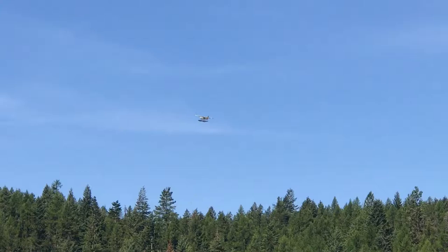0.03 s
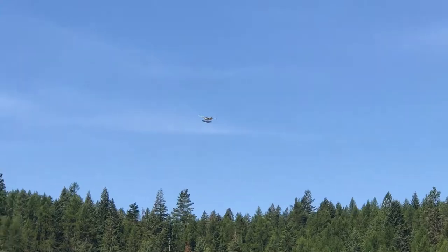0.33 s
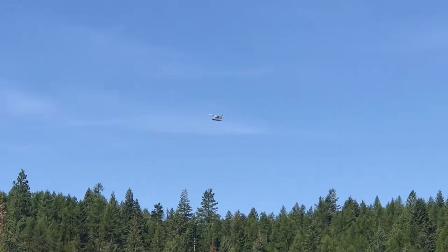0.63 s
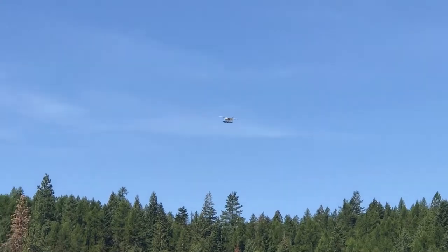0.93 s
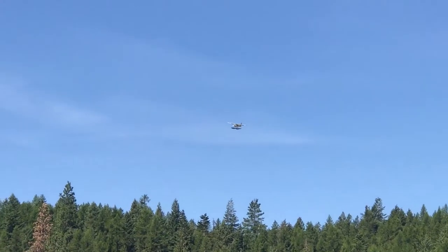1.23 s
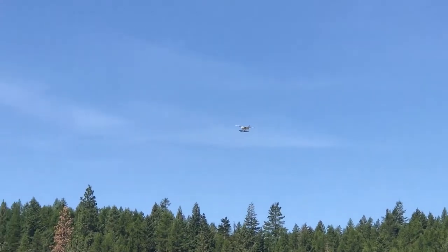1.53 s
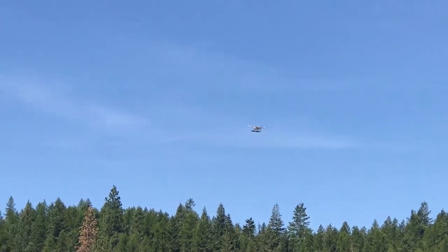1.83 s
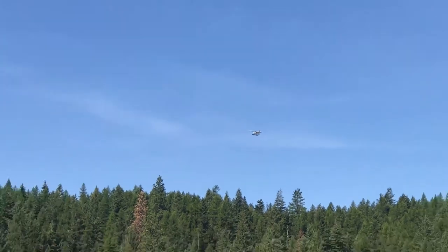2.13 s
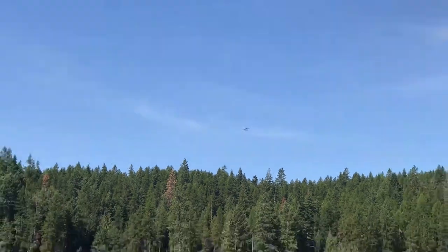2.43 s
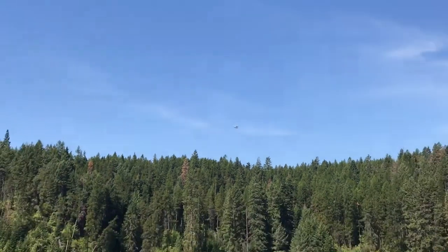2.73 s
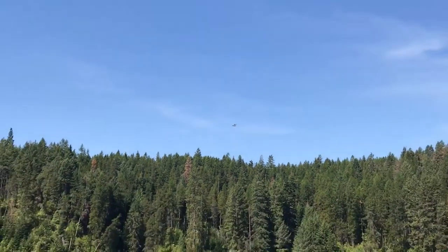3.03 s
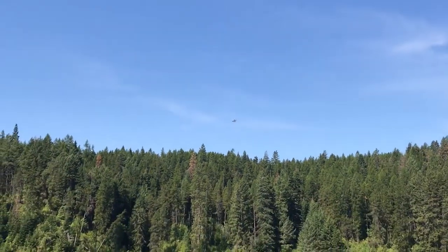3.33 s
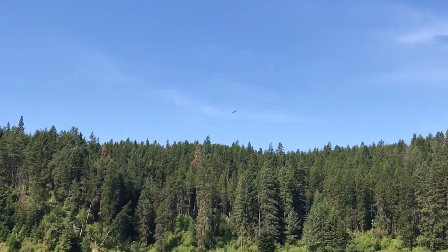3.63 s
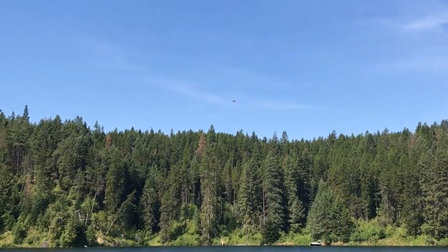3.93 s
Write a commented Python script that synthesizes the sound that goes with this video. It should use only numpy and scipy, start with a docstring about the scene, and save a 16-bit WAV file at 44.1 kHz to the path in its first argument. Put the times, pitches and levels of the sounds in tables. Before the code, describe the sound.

A small propeller plane drones far overhead, with light wind on the microphone.

```python
"""A small propeller aircraft drones far overhead, wavering in the moving air, while light wind
rumbles on the microphone. At first the blades hum and buzz, and a bird chirps faintly.
From about 1.5 s the exhaust takes over, one throb per shaft turn, and a rasp of torn air comes
and goes, combed by its bounce off the ground. After 2 s the aircraft turns away and its pitch
sinks; the handled camera clicks twice, and the rasp swells again near the end."""
import sys
import numpy as np
from scipy import signal
from scipy.fft import rfft, irfft
from scipy.io import wavfile
from scipy.ndimage import uniform_filter1d, map_coordinates

SR = 44100
rng = np.random.default_rng(int(sys.argv[2]) if len(sys.argv) > 2 else 0)


def output_pcm(signal):
    """Save a mono or channel-first signal as 16-bit PCM at the path in sys.argv[1].

    Samples are clipped to [-1, 1] before scaling.
    """
    pcm = np.clip(np.atleast_2d(signal).T, -1, 1) * 32767
    wavfile.write(sys.argv[1], SR, np.round(pcm).astype(np.int16))


N = 176400
T = np.arange(N) / SR

# Shaft speed as heard from the ground: time_s, rate_hz
SHAFT_RATE = [(.13, 47.58), (.7, 47.66), (1.15, 47.72), (1.4, 47.36), (1.7, 48.03), (2.12, 47.55),
              (2.54, 46.63), (2.99, 45.51), (3.28, 44.16), (3.51, 43.53), (3.7, 42.9), (4, 42.77)]
# Envelopes of the blade-passing hum, its octave, the growl and the thin buzz: time_s, level_db
HUM_LEVEL = [(.13, -41), (.5, -34), (.75, -35), (1.03, -36.5), (1.3, -41), (1.75, -47.5), (2.5, -49),
             (3.4, -52), (3.7, -42), (4, -45)]
OCTAVE_LEVEL = [(.13, -55.5), (.27, -38), (.55, -44), (1.03, -36.5), (1.3, -43), (1.65, -52.5), (2.3, -50),
                (2.6, -47), (2.8, -40), (3.25, -44), (3.6, -43.5), (4, -54.5)]
GROWL_LEVEL = [(.13, -47.5), (.25, -43.5), (.44, -44.5), (.51, -40.5), (.65, -39), (.78, -43),
               (1.03, -41.5), (1.3, -48.5), (1.6, -50.5), (2.1, -58.5), (2.7, -54), (4, -76)]
BUZZ_LEVEL = [(.13, -56), (.3, -46), (.75, -52.5), (1.03, -48), (1.3, -47.5), (1.6, -47), (2.1, -54.5),
              (2.6, -58), (4, -65)]
# Harmonics of the blades' growl and buzz and of the exhaust throb: shaft_multiple, gain_db
GROWL_HARMONICS = [(8, -3.5), (9, -8.5), (10, -7.5), (11, -6.5), (12, -8.5), (13, -8.5), (14, -3.5)]
BUZZ_HARMONICS = [(16, -2), (18, -9), (20, -8.5), (22, -5), (24, -7), (26, -23.5), (28, -10), (30, -16.5),
                  (32, -16)]
THROB_HARMONICS = [(3, -27.5), (4, -31), (5, -10.5), (6, 1.5), (7, -2), (8, -6.5), (9, -9), (10, -25),
                   (11, -20)]
# Each exhaust beat's lag behind a blade pulse and its phase smear: time_s, lag_rad, smear_rad
BEAT_SHAPE = [(1.55, .65, .2), (1.9, .7, .38), (2.4, .9, .3), (2.8, -.8, -.27), (3.5, -.8, -.3)]
# Envelopes of the exhaust throb, the low roar and the high rasp: time_s, level_db
THROB_LEVEL = [(.13, -48), (.22, -48.5), (.42, -45.5), (.5, -37.5), (.62, -47), (.8, -44.5), (1.05, -38),
               (1.3, -47.5), (1.41, -43), (1.5, -36), (1.6, -34), (1.75, -36.5), (2, -37.3), (2.3, -38),
               (2.55, -40.5), (2.8, -43), (3.05, -41), (3.35, -41.5), (3.55, -47), (3.72, -45), (4, -59)]
ROAR_LEVEL = [(.13, -40.5), (.24, -41.5), (.34, -44), (.44, -45), (.52, -37), (.65, -44.5), (.8, -38.5),
              (1, -37.5), (1.3, -42), (1.58, -43.5), (1.8, -40.5), (1.95, -41.5), (2.3, -45.5), (3, -53),
              (3.6, -54.5), (4, -57)]
RASP_LEVEL = [(.13, -52), (.3, -51), (.42, -55), (.65, -53.5), (.8, -51.5), (1, -51.5), (1.15, -53.5),
              (1.33, -47), (1.44, -41.5), (1.55, -46.5), (1.67, -47), (1.82, -51.5), (2.03, -46),
              (2.15, -50), (2.33, -45), (2.45, -51), (2.67, -48.5), (2.87, -53), (3.07, -51.5),
              (3.2, -45.5), (3.4, -49.5), (3.53, -42), (3.62, -40), (3.72, -42), (3.85, -44), (4, -45.5)]
# Delay of the ground bounce: time_s, delay_ms
GROUND_DELAY = [(.13, 2.494), (1.4, 2.438), (2.1, 2.39), (3.3, 2.773), (3.65, 2.67), (4, 2.5)]
# Tone colour of each noise layer: frequency_hz, gain_db
ROAR_EQ = [(100, -14), (220, -3.5), (330, 6.5), (450, -4), (600, 4.5), (800, -1.5), (1150, -3), (1600, -13),
           (2500, -31.5), (5000, -66)]
RASP_EQ = [(300, -32), (700, -4.5), (1150, 1), (1450, 1.5), (1800, 3.5), (2300, -1.5), (2700, -7.5),
           (3200, -14.5), (4000, -22.5), (5000, -40.5), (8000, -71.5)]
RUMBLE_EQ = [(20, -32), (32, -22.5), (48, -0.5), (70, 0.5), (110, -3.5), (160, -4), (300, -0.5),
             (1000, -17), (3000, -66.5)]
PUFF_EQ = [(20, -22), (40, -4), (60, 0), (120, -3), (170, -12), (300, -32), (1500, -80)]
HISS_EQ = [(1000, 9.5), (4000, 8), (6000, 3), (7600, 0), (8600, 3.5), (10500, -2.5), (12000, 3),
           (14000, -1.5), (14900, 1), (15500, -2)]
CLICK_EQ = [(1000, -22), (2300, -1), (3000, -11), (3800, -3), (4700, -10), (5600, -7), (6700, -24),
            (7300, -18), (7900, -3), (8800, 1.5), (10400, -7), (11500, 1), (12800, 6), (14400, 2),
            (15200, -15)]
# Puffs of wind on the microphone: centre_s, level_db, half_length_s
PUFFS = [(0.214, -47.5, 0.035), (0.433, -40.5, 0.054), (0.652, -38.5, 0.02), (1.052, -39.5, 0.013),
         (1.302, -48, 0.023), (2.007, -47, 0.046), (2.374, -46.5, .04)]
# Ticks of the camera body: start_s, peak_db
CLICKS = [(2.3085, -54), (2.661, -24)]
# Bird notes: centre_s, pitch_hz, glide_hz_per_s, peak_db, half_length_s
CHIRPS = [(.486, 4380, 15000, -72, .011), (.711, 4280, 0, -53.5, .0011), (.748, 5150, 0, -65, .001)]

BLADE_SMEAR_RAD = .06  # higher harmonics lag, which softens each blade pulse
LIMP_RAD = .048  # exhaust beats fall alternately early and late by this shaft angle
RING_MULTIPLE = 6.5  # centre of the exhaust's ring, in shaft rates
ROAR_TRIM_DB, GROUND_GAIN = -1.5, .45
RUMBLE_DB, RUMBLE_FADE_DB_PER_S, HISS_DB = -43.5, .2, -73
CLICK_T60_S = .0049
OPEN_S, TOP_HZ = .12, 15800


def propeller(shaft):
    """Two blades chop the air: a low hum, under a growl and a buzz that moving air shakes more."""
    def harmonic(k, angle, **waver):
        return partial(k * angle - BLADE_SMEAR_RAD * k ** 2, **waver)

    hum = amp(curve(HUM_LEVEL)) * harmonic(2, shaft, waver_db=.5, drift_rad=.11, rate_hz=6.9)
    hum += amp(curve(OCTAVE_LEVEL)) * harmonic(4, shaft, waver_db=2.95, drift_rad=.16, rate_hz=14)
    hum *= amp(.9 * wobble(28))
    shaken = shaft + .035 * wobble(22)
    growl = sum(amp(db) * harmonic(k, shaken, waver_db=2.8, drift_rad=.55, rate_hz=10)
                for k, db in GROWL_HARMONICS)
    buzz = sum(amp(db) * harmonic(k, shaken, waver_db=3.5, drift_rad=.65, rate_hz=11)
               for k, db in BUZZ_HARMONICS)
    flutter = amp(1.5 * wobble(20))
    return hum + flutter * (amp(curve(GROWL_LEVEL)) * growl + amp(curve(BUZZ_LEVEL)) * buzz)


def exhaust(shaft):
    """One ringing, limping beat per shaft turn, smeared and made uneven by the long way down."""
    times, lags, smears = np.transpose(BEAT_SHAPE)
    limp = LIMP_RAD * np.cos(shaft / 2)
    crank = shaft - np.interp(T, times, lags) + limp + .029 * wobble(30)
    smear = np.interp(T, times, smears)
    beats = np.zeros(N)
    for k, db in THROB_HARMONICS:
        phase = k * crank + smear * (k - RING_MULTIPLE) ** 3 - np.pi / 2
        beats += amp(db) * partial(phase, waver_db=1.4, drift_rad=.22, rate_hz=11)
    return amp(curve(THROB_LEVEL) + .78 * wobble(30)) * beats


def torn_air(shaft):
    """The blades tear the air into a low roar and a high rasp, heard direct and off the ground."""
    roar = churn(shaft, ROAR_EQ, per_blade=.068, per_turn=.07, flutter_db=1.25, patchy_db=5)
    rasp = churn(shaft, RASP_EQ, per_blade=.21, per_turn=.18, flutter_db=.8, patchy_db=1.88)
    return (amp(curve(ROAR_LEVEL) + ROAR_TRIM_DB) * ground_bounce(roar)
            + amp(curve(RASP_LEVEL)) * ground_bounce(rasp))


def churn(shaft, eq, per_blade, per_turn, flutter_db, patchy_db):
    """Rushing noise that swells with each blade and each turn, and flutters on its way down."""
    pulsing = np.exp(per_blade * np.cos(2 * shaft) + per_turn * np.cos(shaft))
    rush = equalise(patchy_noise(patchy_db) * pulsing, eq)
    return unit_rms(rush * amp(flutter_db * wobble(45)))


def patchy_noise(depth_db):
    """White noise with loud and soft patches in time and frequency, as if through moving air."""
    spectrum = signal.stft(rng.standard_normal(N), nperseg=1024)[2]
    patches = uniform_filter1d(rng.standard_normal(spectrum.shape), 9, axis=0)
    patches = uniform_filter1d(patches, 10, axis=1)
    return signal.istft(spectrum * amp(depth_db * unit_rms(patches)), nperseg=1024)[1][:N]


def ground_bounce(direct):
    """The ground returns a slightly late copy, which combs the sound like a slow flanger."""
    bounce = np.interp(T - curve(GROUND_DELAY) / 1000, T, direct)
    return unit_rms(direct + GROUND_GAIN * bounce)


def wind():
    """Wind on the microphone: a lumpy rumble that eases a little, soft puffs and a faint hiss."""
    rumble = unit_rms(equalise(rng.standard_normal(N), RUMBLE_EQ) * amp(3.2 * wobble(13)))
    swells = sum(amp(db) * np.exp(-((T - centre) / half_length) ** 2)
                 for centre, db, half_length in PUFFS)
    puffs = swells * unit_rms(equalise(rng.standard_normal(N), PUFF_EQ))
    hiss = unit_rms(equalise(rng.standard_normal(N), HISS_EQ))
    return amp(RUMBLE_DB - RUMBLE_FADE_DB_PER_S * T) * rumble + puffs + amp(HISS_DB) * hiss


def camera_clicks():
    """The handled camera body gives dry, bright ticks: a snap with a very short scrape."""
    out = np.zeros(N)
    for start, peak_db in CLICKS:
        decay = (T >= start) * amp(-60 * np.abs(T - start) / CLICK_T60_S)
        contact = .13 * rng.standard_normal(N) * decay  # the scrape
        contact[round(start * SR)] += 1  # the snap
        tick = equalise(contact, CLICK_EQ)
        out += amp(peak_db) * tick / np.abs(tick).max()
    return out


def bird():
    """A far bird calls, faint and high: one rising note and two short pips."""
    out = np.zeros(N)
    for centre, pitch, glide, peak_db, half_length in CHIRPS:
        t = T - centre
        envelope = amp(peak_db) * np.exp(-(t / half_length) ** 2)
        out += envelope * np.sin(2 * np.pi * (pitch + glide * t / 2) * t)
    return out


def partial(phase, waver_db, drift_rad, rate_hz):
    """A tone of rms about 1 whose level and phase waver."""
    gain = np.sqrt(2) * amp(waver_db * wobble(rate_hz))
    return gain * np.cos(phase + drift_rad * wobble(rate_hz))


def wobble(rate_hz):
    """Smooth random modulation through rate_hz points a second."""
    return map_coordinates(rng.standard_normal(400), [T * rate_hz], mode="wrap")


def equalise(x, eq):
    """Shape x with an EQ curve drawn on a log frequency axis."""
    hz, db = np.transpose(eq)
    bins_hz = np.fft.rfftfreq(N, 1 / SR)
    gain = amp(np.interp(np.log(bins_hz + 1), np.log(hz), db))
    return irfft(rfft(x) * gain, N)


def curve(rows):
    """Join (time_s, value) breakpoints into one value per sample."""
    return np.interp(T, *np.transpose(rows))


def amp(db):
    """Decibels to gain."""
    return 10 ** (np.asarray(db) / 20)


def unit_rms(x):
    """Scale to rms 1."""
    return x / np.sqrt(np.mean(x ** 2) + 1e-20)


def scene():
    """The mono mix: one shaft drives every aircraft layer; wind, clicks and a bird join it."""
    shaft = 2 * np.pi * np.cumsum(curve(SHAFT_RATE)) / SR  # angle in radians
    aircraft = propeller(shaft) + exhaust(shaft) + torn_air(shaft)
    return (aircraft + wind() + camera_clicks() + bird())[None]


def record(dry):
    """The microphone opens with a 2 ms fade at OPEN_S and keeps nothing above TOP_HZ."""
    opened = dry * np.clip((T - OPEN_S) / .002, 0, 1)
    passband = np.fft.rfftfreq(N, 1 / SR) < TOP_HZ
    return irfft(rfft(opened) * passband, N)


dry = scene()
out = record(dry)
output_pcm(out)
```